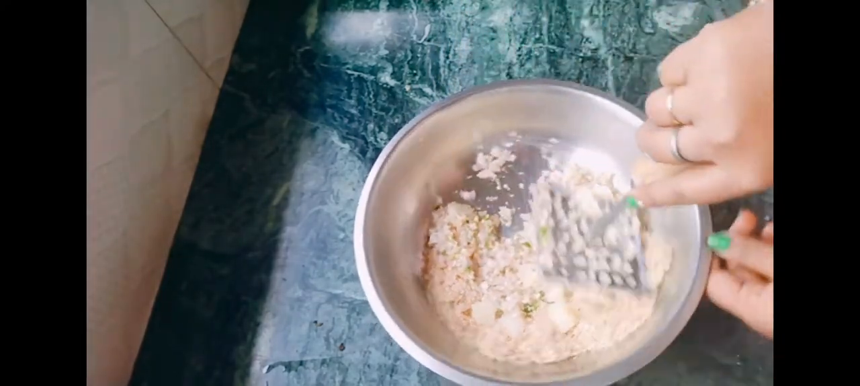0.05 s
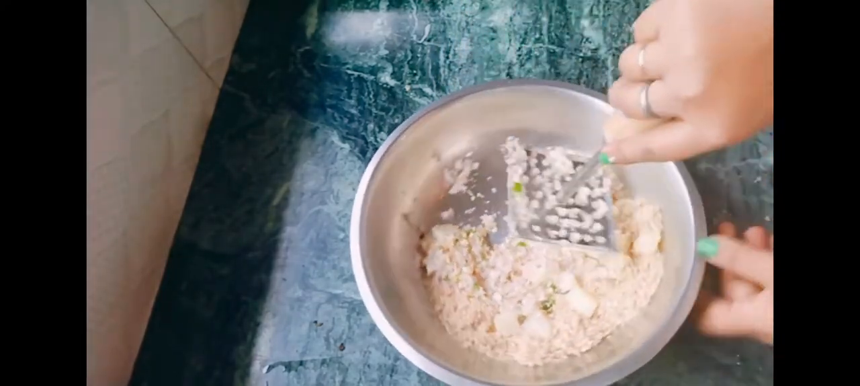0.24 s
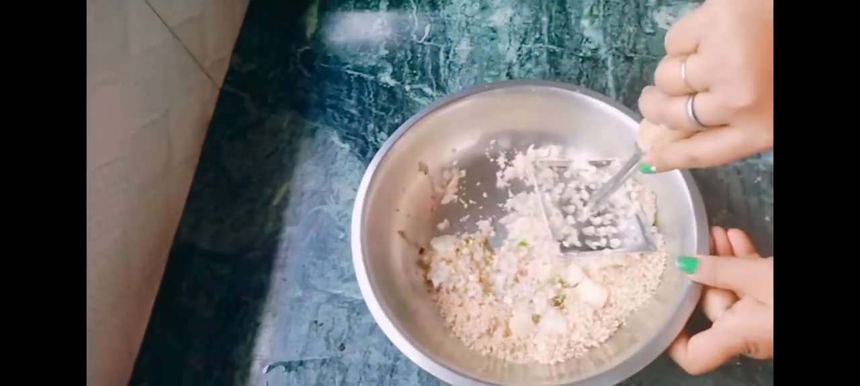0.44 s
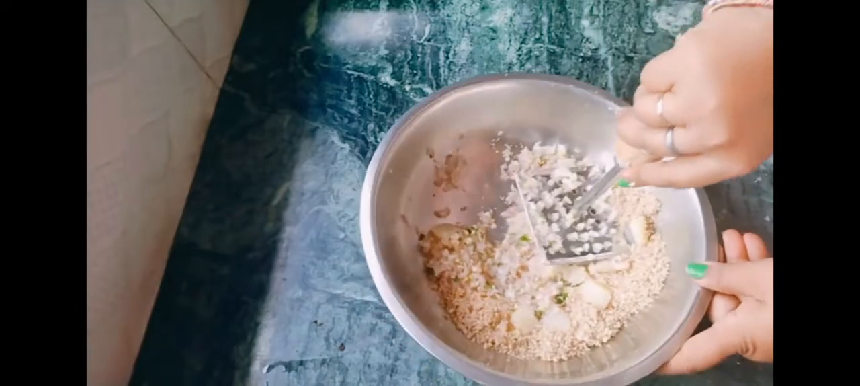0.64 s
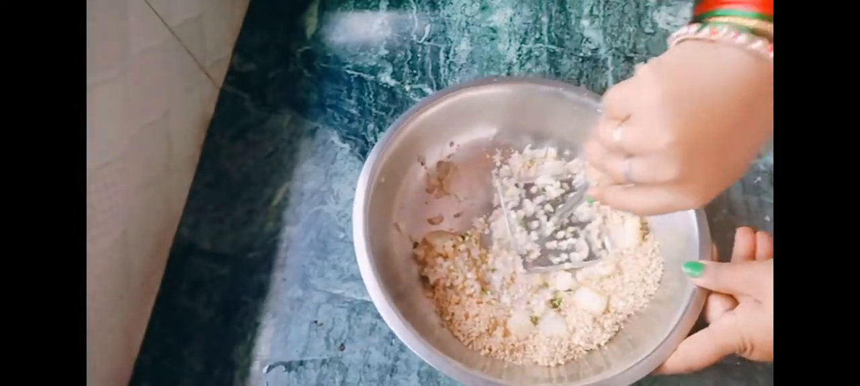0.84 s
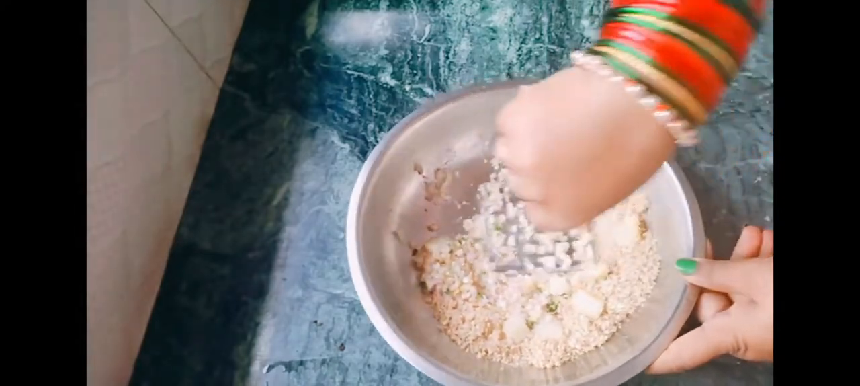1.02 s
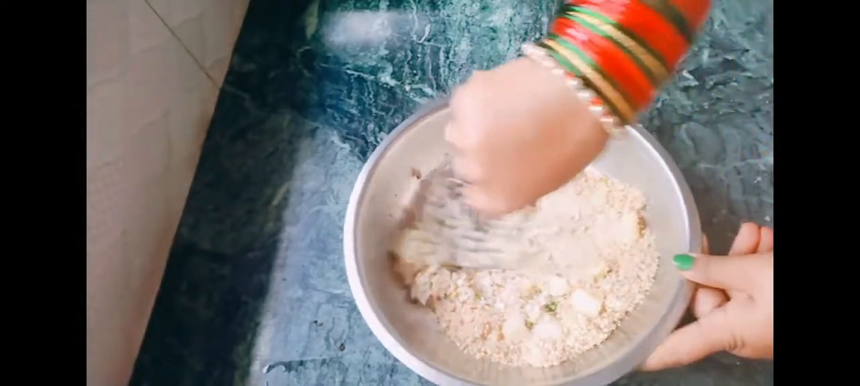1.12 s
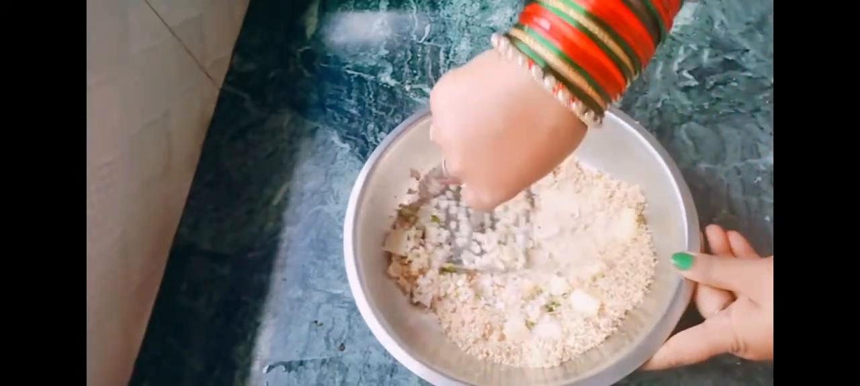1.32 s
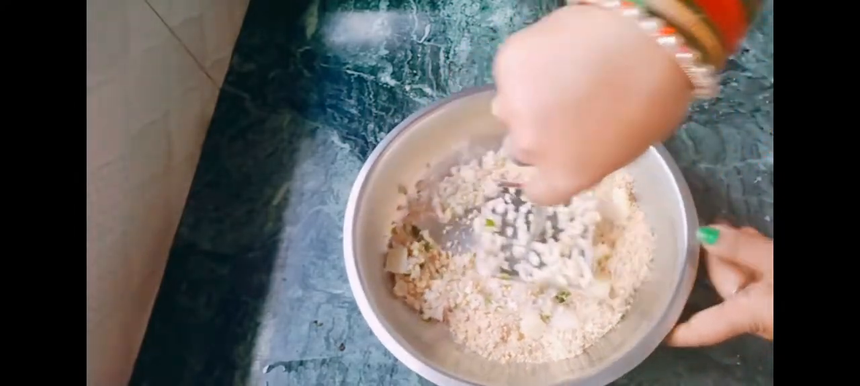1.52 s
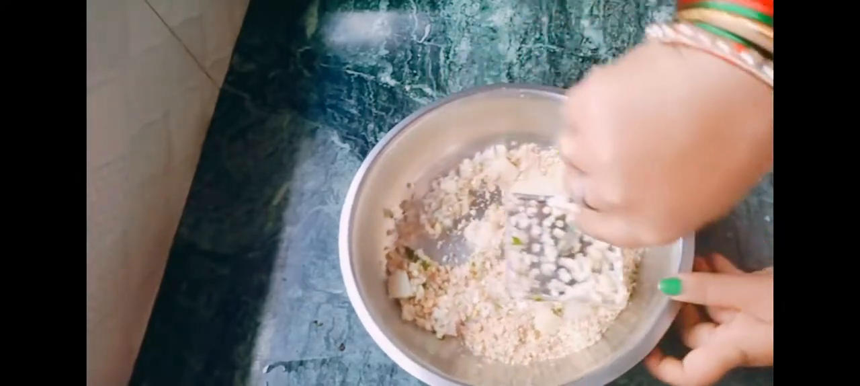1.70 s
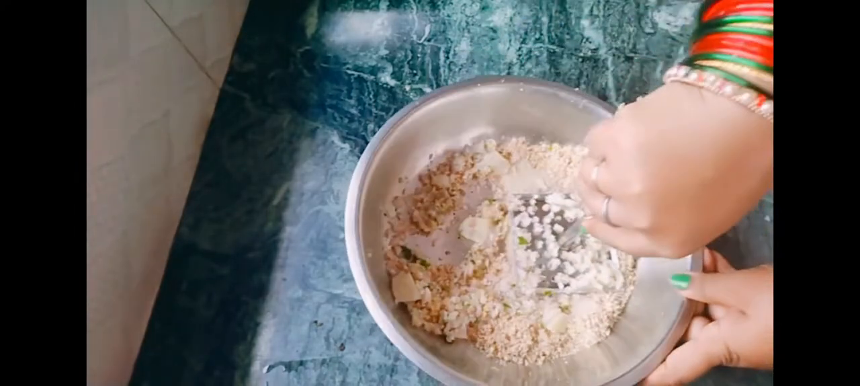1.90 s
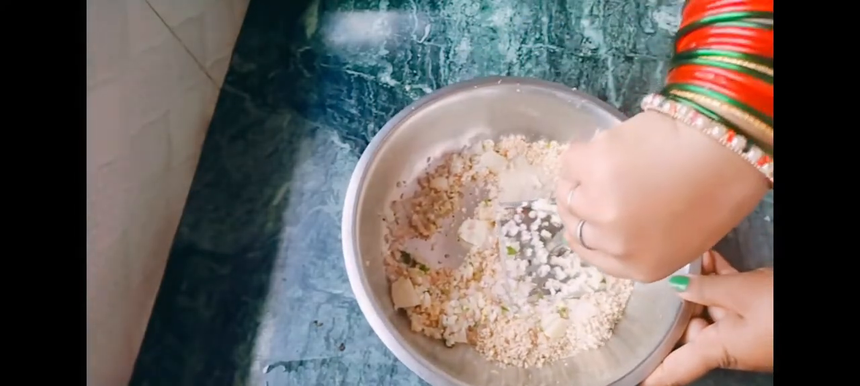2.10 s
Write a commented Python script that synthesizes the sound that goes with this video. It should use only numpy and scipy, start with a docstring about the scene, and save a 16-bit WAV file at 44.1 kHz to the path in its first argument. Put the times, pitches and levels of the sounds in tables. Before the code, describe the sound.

A steel masher clinks and scrapes against a metal bowl of soft food. A bright short clink comes at 0.05 s, a rapid ringing bowl rattle on stone at 0.23-0.4, and lighter ticks at 0.55-0.75. A scrape swells into a loud, dry clack with quick rebounds at 1.06. Small groans and clinks follow, one sharper at 1.75, then near quiet. Dull thuds, faint squeaks, hard small kitchen, close mono.

```python
"""A steel masher works soft food in a steel bowl on a stone kitchen counter.
First come light clinks of damped mode clusters; then the bowl chatters on the stone and its modes ring.
About a second in, the masher slides and lands with a hard, damped clack of short modes and noise, and rebounds.
Then more clinks, and groans from gliding partials. Throughout, filtered random slips scrape, gliding tones
squeak faintly, and low noise thuds as food is pressed, over a quiet hush."""
import sys
import numpy as np
from scipy import signal
from scipy.fft import rfft, irfft
from scipy.io import wavfile

SR = 44100
rng = np.random.default_rng(int(sys.argv[2]) if len(sys.argv) > 2 else 0)


def transcribe(u):
    """Save the signal u as a 16-bit wav file named by the first command-line argument.

    u: samples, shape (n,) or (channels, n), limited to [-1, 1]; the rate is SR.
    q: integer samples, one column per channel.
    """
    v = np.clip(np.atleast_2d(u).T, -1, 1)
    q = np.round(v * 32767).astype(np.int16)
    wavfile.write(sys.argv[1], SR, q)


N = 94815
TIME = np.arange(N) / SR
RING = TIME[:int(0.8 * SR)]  # time axis of one struck or rubbed sound


def amp(db):
    """Decibels to gain."""
    return 10 ** (np.asarray(db) / 20)


def evened(x):
    """Scales to unit power."""
    return x / np.sqrt(np.mean(x ** 2) + 1e-20)


def fade(t, t60_s):
    """Exponential decay, 60 dB in t60_s."""
    return amp(-60 * t / t60_s)


def rise(rise_s):
    """Linear onset, then full level."""
    return np.minimum(RING / rise_s, 1)


def level_curve(points):
    """Gain over time from (s, dB) points."""
    return amp(np.interp(TIME, *np.transpose(points)))


def read(points, hz):
    """Reads a table along log frequency."""
    f, value = np.transpose(points)
    return np.interp(np.log(hz + 1), np.log(f + 1), value)


def coloured(x, spectrum):
    """Gives x a spectrum, at unit power."""
    gain = amp(read(spectrum, np.fft.rfftfreq(len(x), 1 / SR)))
    return evened(irfft(rfft(x) * gain, len(x)))


def waver(size, hz):
    """Slow random drift of unit power, with a Gaussian roll-off at hz."""
    f = np.fft.rfftfreq(size, 1 / SR)
    spectrum = rfft(rng.standard_normal(size)) * np.exp(-(f / hz) ** 2)
    return evened(irfft(spectrum, size))


def add(mix, start_s, sound):
    """Mixes a sound in at start_s, in place."""
    part = mix[max(round(start_s * SR), 0):][:len(sound)]
    part += sound[:len(part)]


def thinned(x, hz, order=4):
    """A small body radiates little bass."""
    return signal.sosfilt(signal.butter(order, hz, "highpass", fs=SR, output="sos"), x)


def ring(modes):
    """Struck modes die away, each at its own speed."""
    return sum(amp(db) * fade(RING, t60_s) * np.sin(2 * np.pi * hz * RING) for hz, db, t60_s in modes)


def burst(spectrum, t60_s):
    """A crowd of modes too dense to tell apart, struck at once: decaying noise."""
    return coloured(rng.standard_normal(len(RING)), spectrum) * fade(RING, t60_s)


MODE_SPACING_HZ, STEEL_RIPPLE_DB = 70, 5.5


def steely(spectrum):
    """Breaks a smooth spectrum into the narrow peaks and gaps of thin steel."""
    f = np.arange(100, SR / 2, MODE_SPACING_HZ)
    ripple = np.clip(rng.standard_normal(len(f)), -2, 2)
    ripple = ripple * np.minimum(f / 4000, 1)  # shallower below 4 kHz
    return np.c_[f, read(spectrum, f) + STEEL_RIPPLE_DB * ripple]


PATCH_S, PATCH_HZ = 0.07, 200


def patchy(x, depth_db):
    """Lets narrow bands swell and sink at random."""
    z = signal.stft(x, SR, nperseg=512, noverlap=384)[2]
    frame_rate = np.fft.fftfreq(z.shape[1], 128 / SR)
    bin_lag = np.fft.fftfreq(len(z), SR / 512)
    rate, lag = np.meshgrid(frame_rate, bin_lag)
    smooth = np.exp(-(rate * PATCH_S) ** 2 - (lag * PATCH_HZ) ** 2)
    noise = rng.standard_normal(z.shape)
    field = evened(np.fft.ifft2(np.fft.fft2(noise) * smooth).real)
    return evened(signal.istft(z * amp(depth_db * field), SR, nperseg=512, noverlap=384)[1][:N])


# Decay of the room. Each row: frequency in Hz, t60 in s.
KITCHEN_DECAY = [(150, 0.34), (400, .42), (1000, 0.4), (2800, 0.46), (7000, 0.34), (14000, 0.42)]
ROOM_GAP_S, ECHO_DENSITY = 0.0058, 0.15


def kitchen(x, wet_db):
    """Adds the tail of a small hard room, each band dying at its own speed."""
    echoes = rng.random(len(RING)) < ECHO_DENSITY
    taps = rng.standard_normal(len(RING)) * echoes * (RING > ROOM_GAP_S)
    hz, t, z = signal.stft(taps, SR, nperseg=256)
    decay = amp(-60 * t / read(KITCHEN_DECAY, hz)[:, None])
    tail = signal.istft(z * decay, SR, nperseg=256)[1]
    return x + amp(wet_db) * signal.fftconvolve(x, tail / np.linalg.norm(tail))[:N]


# Spectrum of the hush. Each row: frequency in Hz, relative level in dB per Hz.
HUSH_SPECTRUM = [(25, -17), (90, 1), (210, -4.5), (370, 0.5), (1000, -7.5), (2500, -21), (5000, -39),
                 (12000, -34), (14000, -18), (16000, -27.5)]
HUSH_DB = -79.5


def hush():
    """Steady coloured noise of the room."""
    return amp(HUSH_DB) * coloured(rng.standard_normal(N), HUSH_SPECTRUM)


# Food gives way under the plate. Each row: time in s, level in dB.
PRESS_LEVEL = [(0, -61), (.1, -89), (.22, -83), (.3, -56.5), (.42, -70.5), (.55, -82.5), (.75, -86),
               (.83, -65.5), (.91, -55), (.97, -63.5), (1.06, -63.5), (1.14, -58), (1.25, -69),
               (1.45, -84.5), (2.15, -115)]
# Spectrum of the thuds. Each row: frequency in Hz, relative level in dB per Hz.
THUD_SPECTRUM = [(25, -29), (55, -23), (90, 4.5), (140, -2.5), (250, 6.5), (370, -20), (1000, -14),
                 (2000, -51), (16000, -86.5)]


def mashing():
    """Dull rumble of food being crushed against the bowl: low noise that swells and sinks."""
    return level_curve(PRESS_LEVEL) * coloured(rng.standard_normal(N), THUD_SPECTRUM)


# The plate slides over the steel. Each row: time in s, level in dB.
SLIDE_LEVEL = [(0, -50.5), (.03, -51), (.1, -66), (.16, -65), (.22, -68.5), (.45, -62.5), (.53, -63.5),
               (.6, -63), (.73, -61), (.85, -74.5), (.93, -67.5), (1.0, -51.5), (1.055, -43), (1.09, -47),
               (1.18, -59), (1.3, -66.5), (1.48, -61.5), (1.59, -77), (1.66, -65), (1.77, -61), (1.9, -88),
               (1.95, -89.5), (2.15, -82.5)]
# Spectrum under light pressure. Each row: frequency in Hz, relative level in dB per Hz.
LIGHT_SPECTRUM = [(300, -28.5), (1500, -28), (2400, -23), (3100, -10.5), (3800, 4.5), (4600, -3),
                  (5600, -2.5), (7200, -12), (10000, -15.5), (16000, -47)]
# Spectrum under heavy pressure. Each row: frequency in Hz, relative level in dB per Hz.
HEAVY_SPECTRUM = [(300, -36), (1100, -12.5), (1600, -1.5), (2200, -3.5), (3300, -1), (4700, 0.5),
                  (6500, -8), (10000, -23), (16000, -37.5)]
LIGHT_DB, HEAVY_DB = -61, -59.5  # slide levels of all glide and of all rasp
GRAINS_PER_S, GRAIN_SPREAD_DB = 3000, 2
GLIDE_PATCHY_DB, RASP_PATCHY_DB, SLIDE_ROOM_DB = 4.5, 2, -9.5


def scrape():
    """Tiny slips excite ever-changing modes of the plate; pressure widens them into a more even rasp."""
    level_db = np.interp(TIME, *np.transpose(SLIDE_LEVEL))
    grain_db = GRAIN_SPREAD_DB * np.minimum(rng.exponential(1, N), 4)
    slips = rng.standard_normal(N) * (rng.random(N) < GRAINS_PER_S / SR) * amp(grain_db)
    glide = coloured(patchy(slips, GLIDE_PATCHY_DB), steely(LIGHT_SPECTRUM))
    rasp = coloured(patchy(slips, RASP_PATCHY_DB), HEAVY_SPECTRUM)
    heavy = np.clip((level_db - LIGHT_DB) / (HEAVY_DB - LIGHT_DB), 0, 1)
    return kitchen(amp(level_db) * ((1 - heavy) * glide + heavy * rasp), SLIDE_ROOM_DB)


SING_RISE_S, SING_T60_S = 0.006, 0.047
SING_WAVER_HZ, SING_FLUTTER = 26, 0.35  # rms pitch drift, rms share of level


def sing(length_s, from_hz, to_hz, partials):
    """An unsteady tone of rubbed steel, bent by the pressure."""
    hz = np.interp(RING, [0, length_s], [from_hz, to_hz])
    hz = hz + SING_WAVER_HZ * waver(len(RING), hz=90)
    level = rise(SING_RISE_S) * fade(np.maximum(RING - length_s, 0), SING_T60_S)
    level = level * (1 + SING_FLUTTER * waver(len(RING), hz=50.03))
    turn = 2 * np.pi * np.cumsum(hz) / SR
    return level * np.sqrt(2) * sum(amp(db) * np.sin(ratio * turn) for ratio, db in partials)


# The pressed bowl groans. Each row: start in s, length in s, from Hz, to Hz, level in dB.
GROAN_EVENTS = [(1.327, 0.066, 696, 749.8, -56), (1.43, 0.074, 752, 793, -62),
                (1.868, 0.061, 765, 765.5, -66)]
# Partials of a groan. Each row: frequency ratio, level in dB.
GROAN_OVERTONES = [(1, -2), (1.9, -5.5), (2.53, -22.5), (3.35, -14.5)]
# The edge of the plate squeaks. Each row: start in s, length in s, from Hz, to Hz, level in dB.
SQUEAK_EVENTS = [(0, 0.038, 1648, 1732, -53), (0.446, 0.29, 1822, 1780, -71.5),
                 (0.734, 0.077, 1660, 1608, -72.5), (.67, .12, 2750, 2880, -78.5),
                 (0.851, 0.14, 843, 780, -69.5), (1.24, 0.16, 2926, 2889, -68),
                 (1.965, 0.14, 4030, 3790, -74.5)]
GROAN_FULL_DB = -55.5  # weaker groans lose overtones
GROAN_DULLING = 2.5  # dB of overtones lost per dB of weaker groan
SING_ROOM_DB = -5


def singing():
    """Rubbing makes the bowl groan in several partials and the plate squeak in one."""
    out = np.zeros(N)
    for start_s, length_s, from_hz, to_hz, db in GROAN_EVENTS:
        overtone_db = GROAN_DULLING * (db - GROAN_FULL_DB)
        partials = [(ratio, part_db + (ratio > 1) * overtone_db) for ratio, part_db in GROAN_OVERTONES]
        add(out, start_s, amp(db) * sing(length_s, from_hz, to_hz, partials))
    for start_s, length_s, from_hz, to_hz, db in SQUEAK_EVENTS:
        add(out, start_s, amp(db) * sing(length_s, from_hz, to_hz, [(1, 0)]))
    return kitchen(out, SING_ROOM_DB)


# Light touches of the masher on the wall.
# Each row: start in s, level in dB, centre in Hz, width in octaves, t60 in s.
CLINK_EVENTS = [(0.032, -43, 5550, 0.71, 0.14), (.01, -52.5, 896, 0.41, 0.14),
                (0.0352, -25, 4180, 0.31, 0.041), (0.044, -40.5, 2160, 0.47, .11),
                (0.05, -52, 1306, 0.1, 0.26), (0.479, -56.5, 6830, .12, 0.16),
                (0.5538, -37, 4030, 0.21, 0.039), (.6025, -45.5, 7800, 0.44, .05),
                (0.7313, -43, 4000, .3, 0.025), (1.037, -43.5, 503, 0.13, 0.085),
                (1.2465, -52, 4850, 0.44, 0.032), (1.2714, -42, 5740, 0.38, 0.023),
                (1.33, -49.5, 6860, 0.15, 0.051), (1.3934, -57.5, 6320, 0.14, 0.068),
                (1.415, -51.5, 6660, 0.17, 0.026), (1.436, -39, 9120, 0.04, 0.046),
                (1.448, -39, 9400, 0.1, 0.03), (1.4376, -58.5, 7700, 0.28, 0.18),
                (1.445, -56, 14300, 0.05, 0.054), (1.655, -69, 8500, 0.36, 0.13),
                (1.675, -58.5, 7000, .2, .08), (1.709, -49, 6950, 0.22, 0.095),
                (1.712, -62, 1405, 0.038, 0.045), (1.746, -49, 4600, .5, 0.11),
                (1.7536, -28.5, 4236, 0.16, 0.018), (2.113, -68, 8490, .2, .08)]
CLINK_RISE_S, CLINK_ROOM_DB = 0.0077, -7.5
CLINK_SKIRT_DB, CLINK_PATCHY_DB = -29.5, 4.5


def clinks():
    """Each touch rings one uneven cluster of modes, over a weak broad skirt."""
    out = np.zeros(N)
    f = np.arange(100, SR / 2, 130)
    skirt = amp(CLINK_SKIRT_DB) / (1 + (2600 / f) ** 4) / (1 + (f / 9000) ** 6)
    for start_s, db, hz, octaves, t60_s in CLINK_EVENTS:
        hump = skirt + np.exp(-0.5 * (np.log2(f / hz) / octaves) ** 2)
        cluster_db = 20 * np.log10(hump) + CLINK_PATCHY_DB * rng.standard_normal(len(f))
        add(out, start_s, amp(db) * rise(CLINK_RISE_S) * burst(np.c_[f, cluster_db], t60_s))
    return kitchen(out, CLINK_ROOM_DB)


# The bowl chatters on the counter.
# Each row: start in s, level in dB, extra dB of the upper modes, extra dB of the lower modes.
BOWL_BOUNCES = [(0.2297, -23.5, 1.9, 2.5), (.2452, -21, -1.7, -11), (.2595, -30, -4.5, -1.4),
                (.2768, -37, 7, -10), (.2967, -26.5, -21, 0.46), (.311, -39, 10, 3.5),
                (.3391, -34.5, -12, -5.5), (.4111, -52, 8, -2)]
# Ring of the bowl. Each row: frequency in Hz, level in dB, t60 in s.
BOWL_MODES = [(258, -18, 0.3), (299, -21, .28), (382, -2.5, .04), (435, -15.5, .15), (709.3, 0.9, .27),
              (739, -6, .27), (775, -6, .11), (1021, -13.5, .2), (1053, -19.5, 0.46), (1273, -11.5, 0.3),
              (1341, -13.5, 0.37), (1387.6, -2.5, .15), (1421, -0.54, 0.19), (1490, -16.5, 0.36),
              (1701, -18.5, .32), (1883, -20, .36), (3240, -27.5, .3), (6800, -23, 0.33)]
# Its dense minor modes. Each row: frequency in Hz, relative level in dB per Hz.
SHIMMER_SPECTRUM = [(100, -26.5), (300, 6.5), (1500, -1), (2400, -7), (5600, -19.5), (7000, -2.5),
                    (9800, -14.5), (12500, -22), (16000, -39.5)]
UPPER_HZ, LOWER_HZ = 1000, 600  # upper modes lie above, lower modes below
BOWL_RISE_S, BOWL_LOW_HZ = 0.0017, 232
SHIMMER_DB, SHIMMER_T60_S = -5.5, 0.18
BOWL_MODES_ROOM_DB, SHIMMER_ROOM_DB = -20.5, -7.5


def bowl():
    """Each bounce rings the bowl again; where it lands sets the share of the upper and lower modes."""
    main, dense = np.zeros(N), np.zeros(N)
    onset, minor_modes = rise(BOWL_RISE_S), steely(SHIMMER_SPECTRUM)
    for start_s, db, upper_db, lower_db in BOWL_BOUNCES:
        modes = [(hz, mode_db + upper_db * (hz > UPPER_HZ) + lower_db * (hz < LOWER_HZ), t60_s)
                 for hz, mode_db, t60_s in BOWL_MODES]
        add(main, start_s, amp(db) * onset * ring(modes))
        dense_db = db + 0.5 * upper_db + SHIMMER_DB
        add(dense, start_s, amp(dense_db) * onset * burst(minor_modes, SHIMMER_T60_S))
    return thinned(kitchen(main, BOWL_MODES_ROOM_DB) + kitchen(dense, SHIMMER_ROOM_DB), BOWL_LOW_HZ)


# The masher lands on the pinned bowl and rebounds. Each row: start in s, level in dB.
MASHER_LANDINGS = [(1.0629, -14), (1.0672, -24.5), (1.0783, -26.5), (1.093, -33.5), (1.1033, -31.5),
                   (1.128, -50)]
# Damped modes of the blow. Each row: frequency in Hz, level in dB, t60 in s.
CLACK_MODES = [(574.3, -10.5, 0.046), (929, -15.5, 0.0079), (1116, 1, 0.024), (1356, -8.5, .025),
               (2486, -19.5, 0.097)]
# Spectrum of the crack. Each row: frequency in Hz, relative level in dB per Hz.
CRACK_SPECTRUM = [(100, -29.5), (400, -16.5), (520, 9), (900, 5.5), (1100, 12.5), (1420, 10.5), (1900, -13),
                  (2450, 0), (4600, -1), (7000, -8.5), (10500, -13.5), (16000, -41)]
CLACK_RISE_S, CLACK_LOW_HZ = 0.00041, 476
CRACK_DB, CRACK_T60_S = -2, 0.025
REBOUND_DULLING = 0.12  # dB of crack lost per dB of weaker blow
CLACK_MODES_ROOM_DB, CRACK_ROOM_DB = -11, -7


def clack():
    """A hard blow, choked by the food and the hand, with duller rebounds; its dense crack fills the room."""
    body, crack = np.zeros(N), np.zeros(N)
    onset, first_db = rise(CLACK_RISE_S), MASHER_LANDINGS[0][1]
    for start_s, db in MASHER_LANDINGS:
        add(body, start_s, -amp(db) * onset * ring(CLACK_MODES))
        crack_db = db + CRACK_DB + REBOUND_DULLING * (db - first_db)
        add(crack, start_s, amp(crack_db) * onset * burst(CRACK_SPECTRUM, CRACK_T60_S))
    in_room = kitchen(body, CLACK_MODES_ROOM_DB) + kitchen(crack, CRACK_ROOM_DB)
    return thinned(in_room, CLACK_LOW_HZ, order=7)


def scene():
    """All sources over the hush of the room, as one channel."""
    return (hush() + mashing() + scrape() + singing() + clinks() + bowl() + clack())[None]


EDGE_HZ = 15800


def record(dry):
    """Band limit: a linear-phase low-pass at EDGE_HZ."""
    lowpass = signal.firwin(511, EDGE_HZ, window=("kaiser", 9), fs=SR)
    return signal.oaconvolve(dry, lowpass[None], "same")


dry = scene()
out = record(dry)
transcribe(out)
```